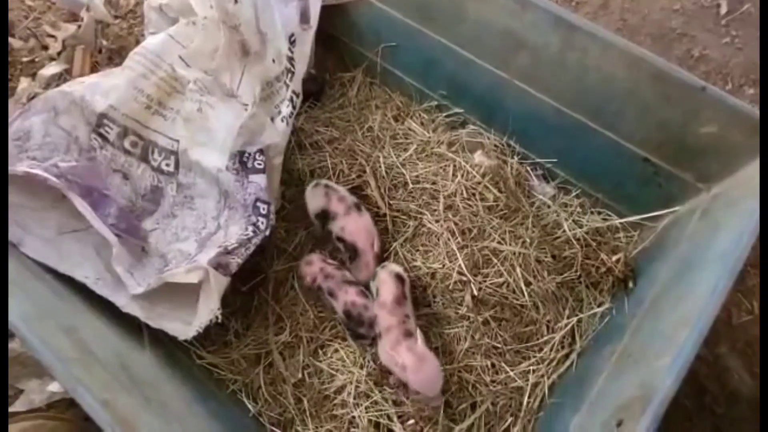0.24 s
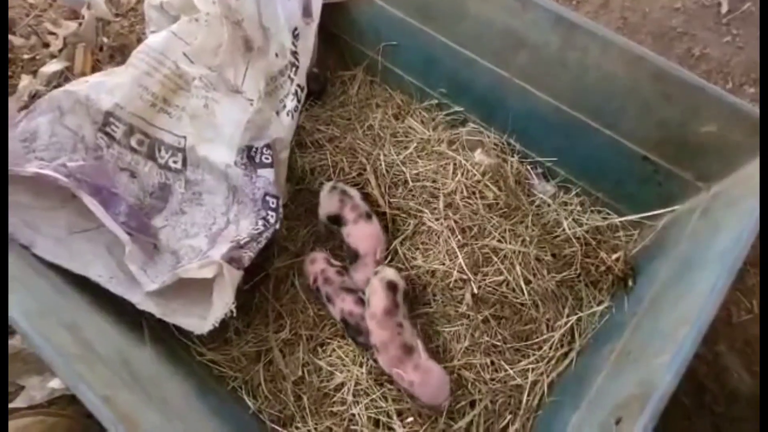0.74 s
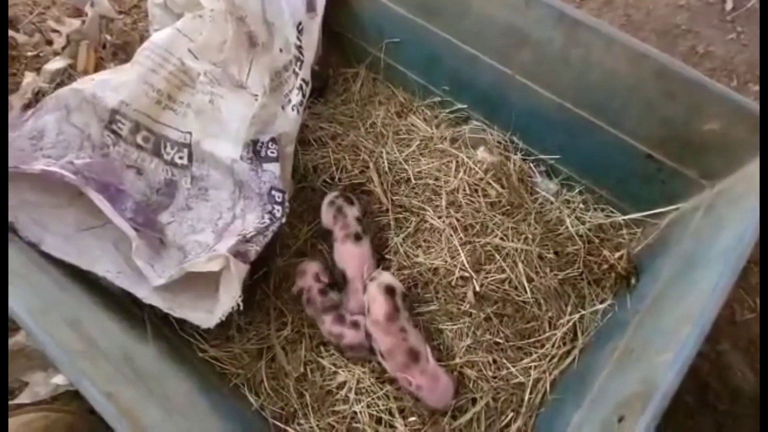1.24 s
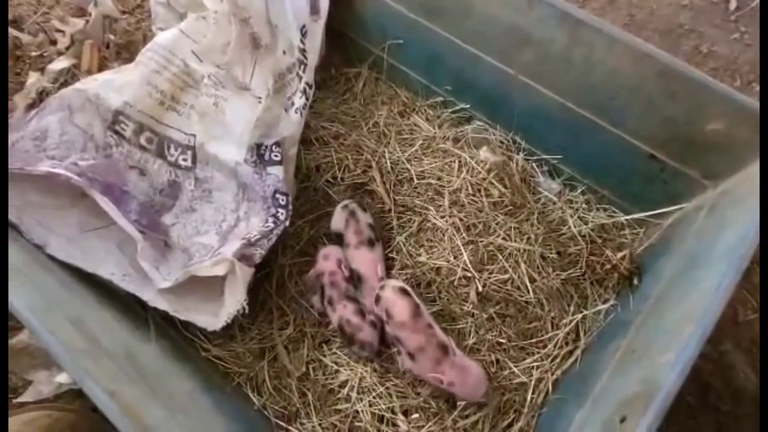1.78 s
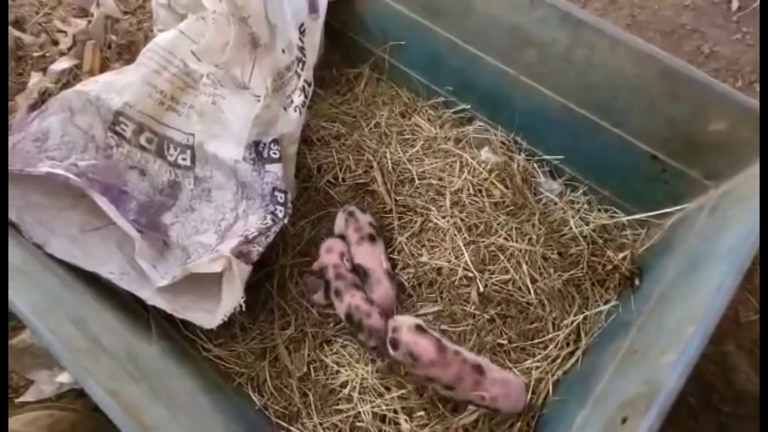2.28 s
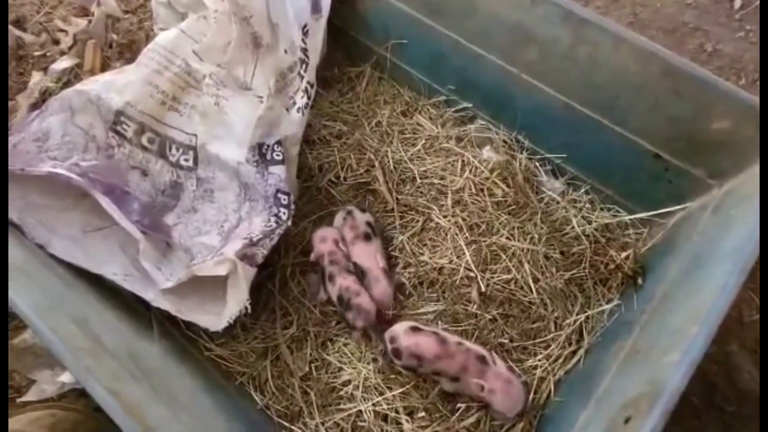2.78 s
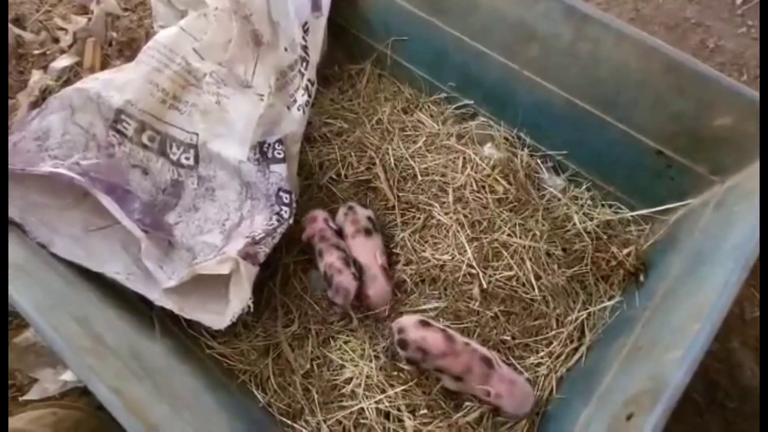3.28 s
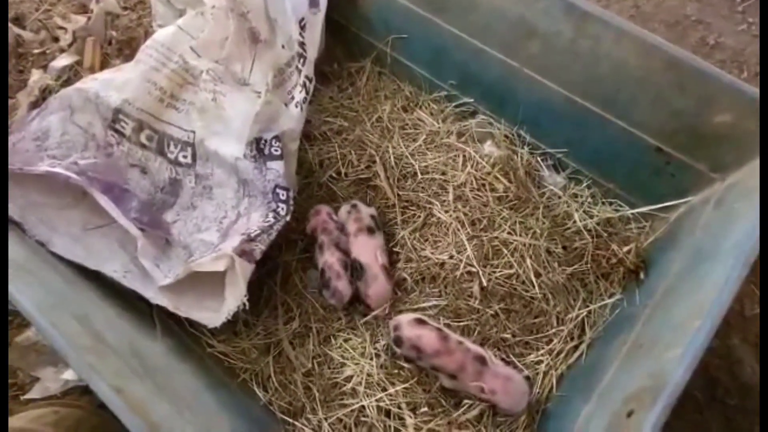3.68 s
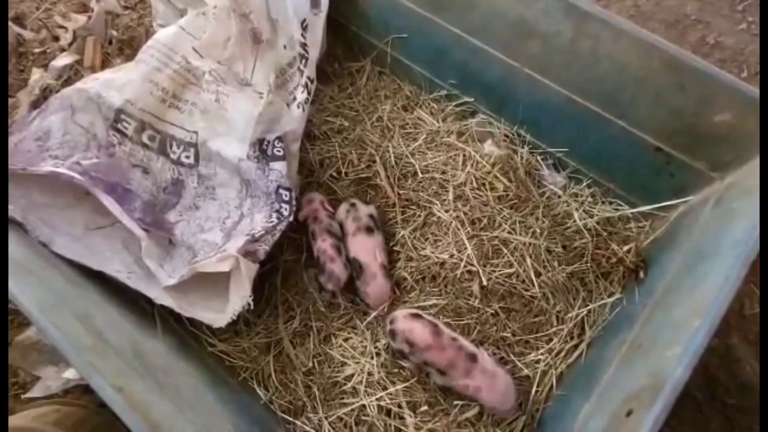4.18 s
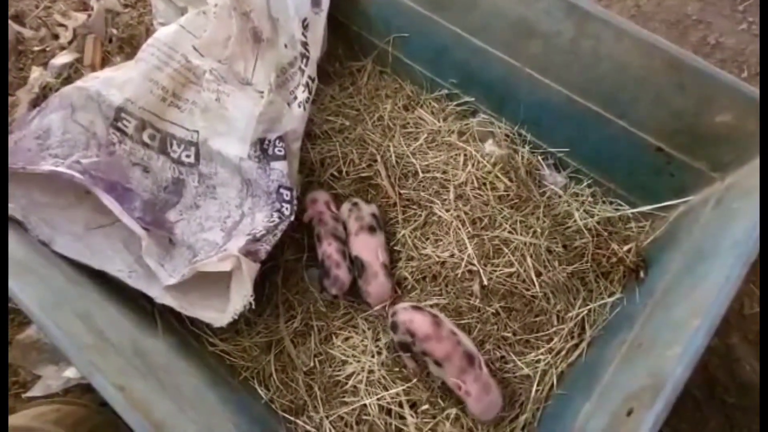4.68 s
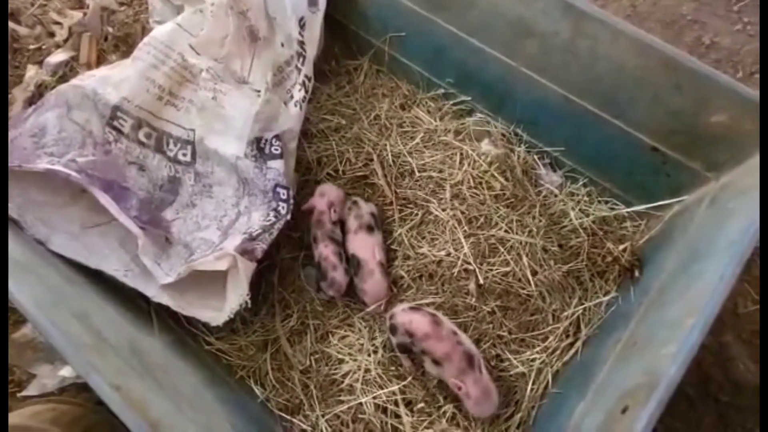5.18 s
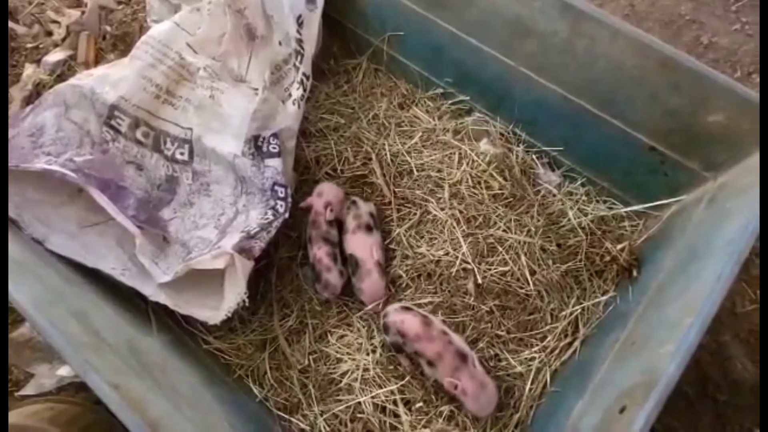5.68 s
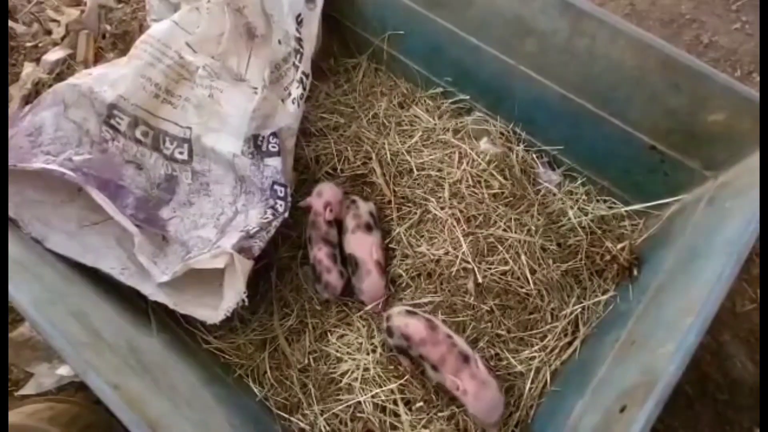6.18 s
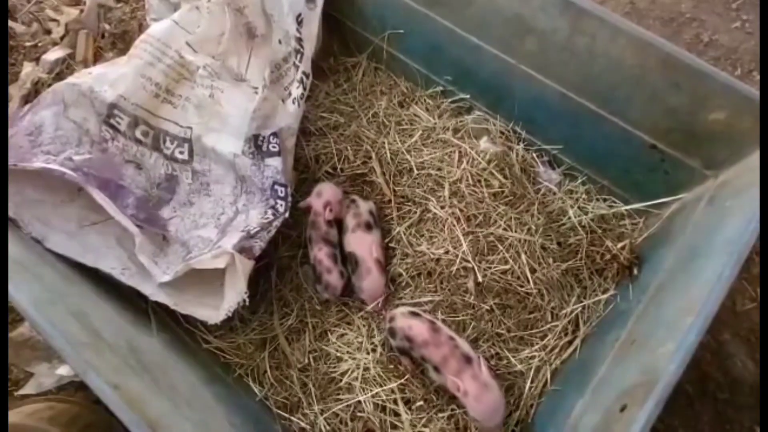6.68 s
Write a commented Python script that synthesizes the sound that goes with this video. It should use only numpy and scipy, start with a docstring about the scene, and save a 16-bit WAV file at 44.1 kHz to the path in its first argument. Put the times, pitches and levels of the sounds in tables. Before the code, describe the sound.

Hungry-sounding baby piglets cry in three quick bouts inside a straw-lined plastic tub, with soft crackling bedding and a deep background drone.

```python
"""In a farm shed, close over a plastic tub, in stereo: newborn piglets shuffle on straw.
A run of thin, hoarse squeals leads to one long, throbbing, rasping cry and a run of throatier ones.
Uneven pulses and puffs of noise, shaped by throat, mouth and tub, make the voices; clear notes are sines.
Shaped noise grains make the straw crackle, and decaying sines make two knocks on the tub floor.
The shed answers with a brief noise tail; low noise and a drone rumble on underneath."""
import sys
import numpy as np
from scipy import signal
from scipy.fft import rfft, irfft, next_fast_len
from scipy.io import wavfile
from scipy.ndimage import uniform_filter1d

SR = 44100
rng = np.random.default_rng(int(sys.argv[2]) if len(sys.argv) > 2 else 0)


def store_pcm(level_fs):
    """Save levels as 16-bit WAV."""
    pcm = np.round(np.clip(level_fs, -1, 1) * 32767).astype(np.int16)
    wavfile.write(sys.argv[1], SR, np.atleast_2d(pcm).T)


N = 305912
TIME = np.arange(N) / SR


def from_db(db):
    """Decibels to amplitude gain."""
    return 10 ** (np.asarray(db) / 20)


def rms_one(x):
    """Scale to unit power."""
    return x / np.sqrt(np.mean(x ** 2) + 1e-20)


def at_hz(points, hz):
    """Read a (frequency, value) table on a log-frequency axis."""
    points = np.array(points)
    return np.interp(np.log(np.maximum(hz, 1)), np.log(points[:, 0]), points[:, 1])


def along(rows, t):
    """Read each column of a curve at the times t."""
    s, *columns = np.transpose(rows)
    return [np.interp(t, s, column) for column in columns]


def coloured(x, spectrum):
    """Give a steady sound a spectrum that falls away steeply beyond its ends, at unit power."""
    size = next_fast_len(x.shape[-1])
    hz = np.arange(size // 2 + 1) * SR / size + 0.00088
    low_skirt = 1 / (1 + (.8 * spectrum[0][0] / hz) ** 8)
    high_skirt = 1 / (1 + (hz / spectrum[-1][0] / 1.2) ** 12)
    gain = from_db(at_hz(spectrum, hz)) * low_skirt * high_skirt
    return rms_one(irfft(rfft(x, size) * gain, size)[..., :x.shape[-1]])


def band(x, low_hz, high_hz, order=4):
    """Butterworth band-pass."""
    sos = signal.butter(order, [low_hz, min(high_hz, .45 * SR)], "band", fs=SR, output="sos")
    return signal.sosfilt(sos, x)


def resonance(x, hz, width_hz):
    """Two-pole resonance with gain 1 on top."""
    r = np.exp(-np.pi * width_hz / SR)
    zeros = np.array([1, 0, -1]) * (1 - r * r) / 2
    poles = [1, -2 * r * np.cos(2 * np.pi * hz / SR), r * r]
    return signal.lfilter(zeros, poles, x + 1e-18)


def drift(rate, size):
    """Smooth chance with spread of about 1, taking a new random value rate times a second."""
    knots = rng.standard_normal(8192)
    return 1.2 * np.interp(np.arange(size) * rate / SR % 8191, np.arange(8192), knots)


def levelled(x):
    """Even out slow swings of level in both channels together, keeping the grain."""
    power = uniform_filter1d(np.mean(x * x, axis=0), size=640)
    return x / np.sqrt(np.abs(power) + 1e-12)


def swell(t, centre, length):
    """A smooth rise and fall."""
    return np.cos(np.pi * np.clip((t - centre) / length, -.5, .5))


# how alike the two microphone sides are: (frequency [Hz], left-right correlation [-1 to 1])
SIDE_CORRELATION = [(60, 1), (125, 0.96), (250, 0.8), (500, 0.83), (1000, -0.2), (2000, -0.14),
                    (8000, -0.0094)]


def diffuse(size):
    """Stereo noise from all around: alike in the bass, nearly unrelated in the treble."""
    padded = next_fast_len(size)
    mid, side = rfft(rng.standard_normal((2, padded)))
    alike = np.clip(at_hz(SIDE_CORRELATION, np.arange(len(mid)) * SR / padded), -1, 1)
    both_sides = np.sqrt(1 + alike) * mid + np.sqrt(1 - alike) * side * [[1], [-1]]
    return rms_one(irfft(both_sides, padded)[:, :size])


# colour of the low rumble: (frequency [Hz], level [dB])
RUMBLE_COLOUR = [(13, -48), (22, -17), (31, -27), (43, 1), (59, 3), (81, -1.5), (114, 1.5), (151, -7.5),
                 (200, -21.5), (230, -15.5), (275, -24), (330, -22), (430, -42), (730, -120)]
# slow growth of the rumble, before its offset and waver: (time [s], level [dB])
RUMBLE_LEVEL = [(0, -53), (1.6, -52), (4.0, -50.5), (6.94, -49.5)]
# the upper edge of the rumble filling in: (time [s], level [dB])
RUMBLE_TOP_LEVEL = [(0, -95), (1.7, -60.5), (3.6, -64), (4.5, -57), (5.6, -58.5), (6.94, -52)]
# colour of the air of the yard: (frequency [Hz], level [dB])
AIR_COLOUR = [(130, -9), (220, -0.5), (349, -17.5), (375, -7.5), (439, -6), (490, -4.5), (1020, 2),
              (1650, -2), (2620, -16.5), (3030, -34.5), (4000, -37.5), (5200, -59), (8800, -120)]
# course of the air, before its offset: (time [s], level [dB])
AIR_LEVEL = [(0, -73), (.6, -67.5), (1.1, -65.5), (3.45, -62), (5.2, -63), (6.15, -63.5), (6.94, -66.5)]


def background(rumble_db=2.5, air_db=6.5, drone_hz=108, drone_db=-56, waver_db=2.5, waver_hz=12):
    """Low, uneven noise with a wavering drone (noise through a sharp resonance), and soft yard air."""
    rumble_level = along(RUMBLE_LEVEL, TIME)[0] + rumble_db + waver_db * drift(waver_hz, N)
    low = coloured(diffuse(N), RUMBLE_COLOUR) * from_db(rumble_level)
    hush = coloured(diffuse(N), AIR_COLOUR) * from_db(along(AIR_LEVEL, TIME)[0] + air_db)
    drone = resonance(rng.standard_normal(N), drone_hz, 4.7)
    drone = rms_one(resonance(drone, drone_hz, 4.7))
    top = rms_one(band(diffuse(N), 120, 158, order=5)) * from_db(along(RUMBLE_TOP_LEVEL, TIME)[0])
    return low + top + hush + from_db(drone_db) * drone


def shed(x, tail_db, t60=0.31):
    """The sound itself, then the diffuse tail of the shed, falling 60 dB in t60 seconds."""
    t = TIME[:SR * 3 // 4]
    tail = diffuse(len(t)) * from_db(-60 * t / t60) * np.clip(t / 0.016, 0, 1)
    tail = rms_one(tail) / np.sqrt(len(t))
    return x + from_db(tail_db) * signal.fftconvolve(np.atleast_2d(x), tail, axes=1)[:, :N]


# balance between the microphone sides: (frequency [Hz], left minus right [dB])
SIDE_BALANCE = [(400, -0.5), (1200, 0.8), (2200, -1), (3300, 2), (4300, 7), (7000, 5.5), (9000, 3),
                (13000, 0.5)]


def leaning(x):
    """Most of the treble reaches the left side more strongly than the right."""
    size = next_fast_len(N + 2048)
    lean_db = at_hz(SIDE_BALANCE, np.arange(size // 2 + 1) * SR / size)
    return irfft(rfft(x, size) * from_db(lean_db * [[.5], [-.5]]), size)[:, :N]


def crackle(per_s, spread_db):
    """Tiny stalk slips of uneven size, scattered at random on each side."""
    sizes = from_db(spread_db * np.minimum(rng.exponential(1, (2, N)), 4)) * rng.standard_normal((2, N))
    return rms_one(sizes * (rng.random((2, N)) < per_s / SR))


# the constant rustle, before its offset and restlessness: (time [s], level [dB])
STRAW_LEVEL = [(0, -76.5), (.6, -70), (1.3, -68), (2.4, -65.5), (3.0, -61), (3.4, -72), (4.05, -74.5),
               (4.6, -67.5), (5.2, -73), (5.7, -75.5), (6.3, -78.5), (6.94, -84)]
# colour of rustle, ticks and bursts: (frequency [Hz], level [dB])
STRAW_COLOUR = [(2500, -17.5), (4000, -9), (5500, 2), (8000, -2), (10000, 0.5), (13000, -7), (14000, -47)]
# bursts of brighter rustling, before their offset: (centre time [s], length [s], level [dB])
RUSTLES = [(1.202, .044, -46.5), (1.236, .03, -57), (1.341, .044, -59), (2.005, .07, -66),
           (2.456, .11, -56.5), (3.023, .092, -57), (3.489, .063, -64.5), (3.64, .071, -70),
           (3.908, .06, -69), (4.382, .09, -57.5), (4.52, .09, -64), (4.975, .04, -61), (5.03, .11, -65),
           (5.18, .04, -82), (6.075, .038, -65.5), (6.383, .062, -73.5)]
# bodies pushing through the bedding, before their offset: (centre time [s], length [s], level [dB])
SHUFFLES = [(0.537, 0.14, -56), (0.657, 0.34, -60.5), (0.836, 0.14, -51), (1.23, 0.067, -53),
            (3.525, 0.046, -55.5), (3.65, 0.08, -51.5)]
# colour of the pushes: (frequency [Hz], level [dB])
SHUFFLE_COLOUR = [(120, -72), (200, -2.5), (488, 1.5), (1020, -14), (1230, -6), (1800, -11.5), (2250, -9.5),
                  (3630, -20.5), (9000, -25.5), (11700, -93), (19800, -120)]


def straw(rustle_db=0, burst_db=1, shuffle_db=2, restless_db=1.2, restless_hz=24, ticks_per_s=14, ticks_db=-7):
    """A restless rustle of dense grains, sparse ticks, bursts, and duller pushes as a piglet shifts."""
    bursts = sum(from_db(db + burst_db) * swell(TIME, s, length) ** 2 for s, length, db in RUSTLES)
    stir = from_db(along(STRAW_LEVEL, TIME)[0] + rustle_db + restless_db * drift(restless_hz, N))
    rustle = coloured(crackle(2500, 1.6), STRAW_COLOUR) * (stir + bursts)
    ticks = coloured(crackle(ticks_per_s, 1.5), STRAW_COLOUR) * stir * from_db(ticks_db)
    push = sum(from_db(db + shuffle_db) * swell(TIME, s, length) ** 2 for s, length, db in SHUFFLES)
    return rustle + ticks + push * coloured(crackle(2500, 2.5), SHUFFLE_COLOUR)


# snapping stalks, before their offset: (time [s], crack level [dB], body relative to crack [dB])
SNAPS = [(1.2, -40, -28), (1.4182, -49.5, -10), (2.5457, -44.5, 7), (2.7172, -43, -8.5),
         (3.634, -44.5, -23), (3.6566, -66, -9), (3.9697, -53, 4), (4.191, -55, -19), (4.202, -50.5, -14),
         (5.427, -61.5, -20)]
# colour of a cracking stalk: (frequency [Hz], level [dB])
STALK_COLOUR = [(1180, -50.5), (2000, -39), (2460, -33.5), (2710, -45.5), (3390, -32.5), (5390, 3),
                (7900, -7), (11500, -6.5), (13500, -22)]


def snaps(decay_s=0.0017, snap_db=4):
    """A dry stalk cracks brightly and knocks the bedding under it: a fast-decaying burst of noise."""
    out, t = np.zeros((2, N)), TIME[:2048]
    for s, crack_db, body_db in SNAPS:
        # partly alike on both sides
        noise = rng.standard_normal((2, len(t))) + rng.standard_normal(len(t))
        body = rms_one(band(noise, 1500, 2700, order=2))
        crack = coloured(noise, STALK_COLOUR) + from_db(body_db) * body
        start = int(s * SR)
        out[:, start:start + len(t)] += from_db(crack_db + snap_db) * crack * np.exp(-t / decay_s)
    return out


# a trotter knocking twice on the tub floor through the straw: (time [s], level [dB])
KNOCKS = [(3.6331, -42), (3.656, -42.5)]
# modes of the tub floor: (frequency [Hz], level relative to the knock [dB], time to fall 60 dB [s])
TUB_FLOOR_MODES = [(380, -11, .05), (513, 2, 0.058), (700, -3.5, 0.037), (1070, -11, 0.033)]


def knocks():
    """Each knock sets the modes of the tub floor ringing briefly, with strengths of its own."""
    out, t = np.zeros((2, N)), TIME[:4096]
    for s, knock_db in KNOCKS:
        start = int(s * SR)
        for hz, db, t60 in TUB_FLOOR_MODES:
            strength = from_db(knock_db + db + rng.normal(0, 2, (2, 1)) - 60 * t / t60)
            out[:, start:start + len(t)] += strength * np.sin(2 * np.pi * hz * t)
    return out


# moments of clearer voice, within the cries and between them, before offset, quaver and flutter:
# (centre time [s], length [s], start pitch [Hz], end pitch [Hz], level [dB], second harmonic over first [dB])
CLEAR_NOTES = [(1.102, .044, 311, 412, -45.5, -38), (1.229, .045, 608, 520, -44, -16),
               (1.363, 0.029, 625, 542, -38, -34), (1.56, 0.037, 586, 662, -38, -29),
               (1.676, 0.056, 572, 664, -42, -19), (1.779, 0.04, 926, 870, -40.5, -28),
               (1.819, 0.091, 563, 524, -45, 4), (1.91, 0.056, 500, 547, -41.5, 3),
               (1.989, 0.048, 835, 868, -32, -13), (2.203, .049, 793, 754, -36.5, -13),
               (2.425, 0.079, 407, 462, -36, -15), (2.583, .07, 612.4, 456, -30, -15),
               (2.653, 0.02, 740, 740, -29, -22), (2.696, .04, 676, 635, -24, -28),
               (2.746, 0.025, 708, 773, -22, -23), (2.838, 0.041, 874, 843, -22.5, -29),
               (2.958, 0.03, 654, 647, -25.5, -24), (3.011, 0.021, 750, 750, -26.5, -22),
               (3.138, 0.03, 434, 449, -33.5, 7), (3.211, 0.042, 625.8, 591, -30, -23),
               (3.293, .09, 354, 300.8, -43, -1), (3.337, .026, 673, 633, -29.5, -28),
               (4.152, 0.07, 408, 470, -34.5, -18), (4.339, 0.038, 548, 481, -32, -6),
               (4.381, 0.055, 437, 410, -45, 10), (4.478, 0.032, 484, 474, -31, -1),
               (4.507, .046, 431, 420, -51.5, 17), (4.623, 0.077, 425, 406.7, -37, 7),
               (4.733, 0.065, 463.3, 415, -34, 0.5), (4.868, .047, 366.8, 374, -31.5, 6.5),
               (4.918, .06, 369.3, 355, -47, 11), (4.986, .05, 342, 328, -54.5, 13.5),
               (5.031, .03, 354, 352, -53.5, 10)]


def clear_notes(notes_db=-1, upper_db=-14, ear_phase=0.61):
    """The folds lock into a short, quavering tone; the tub's walls shift its phase between the sides."""
    out = np.zeros((2, N))
    for centre, length, start_hz, end_hz, level_db, second_db in CLEAR_NOTES:
        at = np.flatnonzero(np.abs(TIME - centre) < length / 2)
        quaver = 1 + .028 * drift(260, len(at))
        flutter = from_db(2.5 * drift(170, len(at)))
        phase = 2 * np.pi * np.cumsum(np.linspace(start_hz, end_hz, len(at)) * quaver) / SR
        shift = ear_phase * rng.choice([-1, 1]) * np.array([[1], [-1]])  # radians
        upper = sum(np.sin(k * phase + shift) for k in range(3, 5))
        overtones = np.sin(2 * phase - shift) + from_db(upper_db) * upper
        tone = np.sin(phase + shift) + from_db(second_db) * overtones
        out[:, at] += from_db(level_db + notes_db) * swell(TIME[at], centre, length) * flutter * tone
    return out


def larynx(pitch_hz, rough, flap_hz, jitter=.085, shimmer_db=5, flap_share=0.95, air_share=0.55):
    """The folds pulse at the pitch; strain breaks them into slow uneven slaps and puffs of turbulent air."""
    rough, size = np.clip(rough, 0, 1), len(pitch_hz)
    turns = np.cumsum(pitch_hz * np.exp(jitter * rough * drift(220, size))) / SR
    flaps = np.cumsum(flap_hz * np.exp(.3 * drift(150, size))) / SR
    # one click for each completed cycle
    pulses, slaps = (rms_one(np.diff(np.floor(cycles), prepend=0)) for cycles in (turns, flaps))
    puffs = rms_one(np.exp(-4 * (flaps % 1)) * rng.standard_normal(size))
    strength = from_db(shimmer_db * rough * drift(252, size))
    return strength * ((1 - rough) * pulses + rough * (flap_share * slaps + air_share * puffs))


def mouth(source, throat, mouth_hz, sweep_db, shut_db=10, wander_db=2):
    """Throat colour, rippling with the tongue, and a sliding peak or dip above which the sound is duller."""
    t = TIME[:len(source)]
    hz, s, frames = signal.stft(source, SR, nperseg=1024, noverlap=896)
    octaves = np.log2((hz[:, None] + 1) / np.interp(s, t, mouth_hz))
    slide = sweep_db * np.exp(-(octaves / 0.3) ** 2) - shut_db * np.clip(octaves / .5, 0, 1)
    tongue = np.interp(s, t, drift(35.37, len(source)))
    ripple = np.cos(2 * np.pi * hz[:, None] / 900 + 2 * tongue)
    gain = from_db(at_hz(throat, hz)[:, None] + slide + wander_db * ripple)
    return signal.istft(frames * gain, SR, nperseg=1024, noverlap=896)[1][:len(source)]


# narrow resonances of the tub and shed, before their offset: (frequency [Hz], width [Hz], level [dB])
TUB_RESONANCES = [(618, 9, -9.5), (800, 32, -5)]


def tub(x, ring_db=-2):
    """The hollow tub favours a few narrow bands."""
    return x + sum(from_db(db + ring_db) * resonance(x, hz, width) for hz, width, db in TUB_RESONANCES)


def walls(x, early_s=0.0089, direct_db=-7):
    """Dense first reflections off the tub, different for every turn of the head."""
    t = TIME[:2048]
    echoes = rms_one(diffuse(len(t)) * np.exp(-t / early_s)) / np.sqrt(len(t))
    echoes[:, 0] += from_db(direct_db)
    return signal.fftconvolve(x[None], echoes, axes=1)


# depth and rate of the flaring upper partials in each kind of cry
THIN_TEAR_DB, LONG_TEAR_DB, THROATY_TEAR_DB, TEAR_HZ = 2.0, 2.0, 1.6, 55


def torn(voice, depth_db, flicker_hz, width_hz=450):
    """Under strain the upper partials flare and drop out, each stretch of the spectrum on its own."""
    size = voice.shape[1]
    hz, s, frames = signal.stft(voice, SR, nperseg=512, noverlap=384)
    flares = 0
    for centre in np.arange(1000, 8000, width_hz):
        flicker = np.interp(s, TIME[:size], drift(flicker_hz, size))
        flares = flares + np.outer(swell(hz, centre, 2 * width_hz) ** 2, flicker)
    return signal.istft(frames * from_db(depth_db * flares), SR, nperseg=512, noverlap=384)[1][:, :size]


def registers(voice, throat_db, rasp_db, edge_db, hiss_db,
              grain_db=0.42, grain_hz=150, spit_db=1.5, spit_hz=260):
    """Effort sets the low throat band, the rasp, the shrill edge and the hiss that rides on the pulses."""
    size = voice.shape[1]
    beat = levelled(np.abs(band(voice, 1500, 8000, order=2)))
    hiss = levelled(band(beat * rng.standard_normal((2, size)), 7600, 13000, order=8))
    grain = grain_db * drift(grain_hz, size)
    parts = [(190, 1500, throat_db), (1500, 3800, rasp_db + grain), (3800, 8000, edge_db + grain)]
    voiced = sum(from_db(db) * levelled(band(voice, low, high, order=8)) for low, high, db in parts)
    hiss_gain = from_db(hiss_db + grain + spit_db * drift(spit_hz, size))
    ending = np.minimum(TIME[:size][::-1] / .07, 1)
    return ending * (voiced + hiss_gain * hiss)


def effort(t, attack_s, hold_s, fade_s):
    """In dB: a swell from near silence, a hold around t = 0, and a fade of 20 dB per fade_s."""
    swelling = np.clip(1 + (t + hold_s / 2) / attack_s, 1e-3, 1)
    return 20 * (np.log10(swelling ** 2) - np.maximum(t - hold_s / 2, 0) / fade_s)


def around(peak_s):
    """The samples of one short squeal and their times from its peak."""
    at = int(peak_s * SR) + np.arange(int(-.1 * SR), int(.17 * SR))
    return at, TIME[at] - peak_s


# what the throat passes of the clear harmonics: (frequency [Hz], level [dB])
CLEAR_THROAT = [(300, -35), (360, -16.5), (440, -2.5), (540, -2), (630, -2), (760, 4), (880, -4),
                (1000, -17), (1200, -11.5), (1430, -13.5), (1800, -31)]


def harmonics(pitch_hz, quaver=.03, quaver_hz=140, count=5):
    """Clear voice: each harmonic swells as the pitch carries it through a resonance of the throat."""
    pitch_hz = pitch_hz * np.exp(quaver * drift(quaver_hz, len(pitch_hz)))
    phase = 2 * np.pi * np.cumsum(pitch_hz) / SR
    tone = sum(from_db(at_hz(CLEAR_THROAT, k * pitch_hz)) * np.sin(k * phase) for k in range(1, count + 1))
    return levelled(walls(tone, early_s=0.0016, direct_db=-2)[:, :len(tone)])


# the last squeal sinking away, before offset, quaver and flutter: (time [s], pitch [Hz], level [dB])
WHINE = [(4.88, 380.6, -50), (4.905, 368.4, -44), (4.948, 359.2, -48), (4.978, 348.4, -50),
         (5.008, 326, -54), (5.034, 352, -51), (5.08, 309.4, -54.5), (5.14, 290, -62)]


def whine(whine_db=0.5, flutter_db=2):
    """A thin tone of two harmonics that wavers, falls and dies away."""
    at = np.flatnonzero((TIME > WHINE[0][0]) & (TIME < WHINE[-1][0]))
    pitch_hz, level = along(WHINE, TIME[at])
    tone = harmonics(pitch_hz, quaver=0.016, count=2)
    gain = from_db(level + whine_db + flutter_db * drift(95, len(at)))
    out = np.zeros((2, N))
    out[:, at] = tone * gain * signal.windows.tukey(len(at), .1)
    return out


# thin squeals, before offsets and pitch sag: (peak time [s], attack [s], fade [s], throat level [dB],
# rasp over throat [dB], shrill edge over throat [dB], pitch [Hz], roughness [0-1], throat resonance [Hz],
# snout resonance [Hz], snout width [Hz], mouth resonance [Hz])
THIN_CRIES = [(1.232, 0.03, 0.068, -54.5, -5.5, -1.5, 580, 0.34, 1080, 3540, 261, 4650),
              (1.37, 0.018, 0.084, -50.5, -1, -2.5, 570, 0.55, 573, 2160, 260, 4330),
              (1.466, 0.04, 0.068, -40, 0, -2, 591, 0.54, 906, 3170, 400, 4430),
              (1.572, 0.028, 0.095, -39.5, -0.5, -0.5, 610, 0.53, 920, 3170, 303, 4300),
              (1.682, 0.042, 0.094, -39, 0, 1.5, 593.6, 0.46, 1120, 2460, 260, 4180),
              (1.786, .019, 0.083, -40.5, -3.5, 2.5, 550, 0.47, 880, 2280, 260, 4700),
              (1.882, 0.03, 0.12, -39.5, -0.5, 2.5, 535, 0.56, 930, 3300, 300, 5350),
              (1.987, 0.048, 0.056, -37, -1.5, -1, 481.2, 0.61, 845, 3050, 400, 5540),
              (2.094, 0.1, .06, -39.5, -2.5, -8, 515, 0.77, 1050, 3300, 400, 4270),
              (2.19, 0.039, 0.083, -40.5, -1.5, 5.5, 486.4, 0.66, 1020, 4600, 787, 4440),
              (2.33, .045, 0.078, -45, -8, 0.5, 431.6, 0.57, 990, 3080, 398, 6060)]
# throat colour of the thin squeals: (frequency [Hz], level [dB])
THIN_THROAT = [(190, -25), (330, -12.5), (473, -12), (533, -7.5), (678, -10.5), (862, -3), (1340, -14),
               (1680, -7), (1920, -10.5), (2220, -1.5), (2720, -8.5), (3270, -6), (4330, -5), (6460, -3.5),
               (8000, -11), (10400, -72.5), (17600, -120)]


def thin_squeals(hold_s=0.027, opening_s=0.05, slide_octaves=0.084, sag_octaves=.07, focus_db=4.5, bite_db=0,
                 throat_db=0.0, rasp_db=0.5, edge_db=-3.5, hiss_db=-22, edge_lag_s=0.0029):
    """Quick, hoarse cries, each with its own throat and snout; the pitch sags while the mouth opens."""
    out = np.zeros((2, N))
    for (peak_s, attack_s, fade_s, level, rasp, edge, pitch_hz, rough,
         throat_hz, snout_hz, snout_width_hz, mouth_hz) in THIN_CRIES:
        at, t = around(peak_s)
        opening = np.tanh(t / opening_s)
        sagging_hz = pitch_hz * 2 ** (-sag_octaves * opening)
        source = larynx(sagging_hz, rough, flap_hz=198.7, jitter=.06, air_share=0.18)
        opening_hz = mouth_hz * 2 ** (slide_octaves * opening)
        voice = mouth(source, THIN_THROAT, opening_hz, sweep_db=2.5, wander_db=1.5)
        focus = from_db(focus_db) * resonance(voice, throat_hz, 83)
        bite = from_db(bite_db) * resonance(voice, snout_hz, snout_width_hz)
        in_tub = walls(tub(voice + focus + bite), direct_db=-8.5)[:, :len(t)]
        strained = torn(in_tub, THIN_TEAR_DB, TEAR_HZ)
        db = level + effort(t, attack_s, hold_s, fade_s)
        late_db = level + edge + effort(t - edge_lag_s, attack_s, hold_s, fade_s)
        out[:, at] += registers(strained, db + throat_db, db + rasp + rasp_db, late_db + edge_db, db + hiss_db)
    return out


# resonances of the wide-open snout in the throaty squeals: (frequency [Hz], width [Hz], level [dB])
SNOUT_RESONANCES = [(2100, 260, -0.5), (3180, 830, 2.5), (4960, 700, 11)]


def snout(x):
    """The open snout adds bite in a few bands."""
    return x + sum(from_db(db) * resonance(x, hz, width) for hz, width, db in SNOUT_RESONANCES)


# throaty squeals, before offsets, glide and clearing: (peak time [s], attack [s], hold [s], fade [s],
# throat level [dB], rasp over throat [dB], shrill edge over throat [dB], lag of the edge [s], pitch [Hz],
# roughness [0-1])
THROATY_CRIES = [(4.149, .022, 0.022, .05, -53, 7.5, -4.5, 0.011, 424, 0.7),
                 (4.262, 0.051, 0.0091, 0.054, -32, 2, -15.5, .046, 451, .85),
                 (4.363, .065, 0.017, 0.064, -32, 6, -11.5, 0.046, 446.7, 0.71),
                 (4.482, 0.085, 0.011, 0.087, -32.5, 7, -8, 0.045, 439, 0.7),
                 (4.602, 0.079, 0.01, 0.068, -31, 8.5, -9, 0.023, 420.9, 0.37),
                 (4.717, .01, 0.046, 0.05, -33.5, 8, -7, 0.025, 432, 0.58),
                 (4.87, 0.069, 0.013, 0.059, -34.5, 6, -6.5, .0098, 364.6, .6),
                 (4.967, .05, 0.025, 0.3, -44.5, -3, -3.5, 0.0037, 337.7, 0.94)]
# throat colour of the throaty squeals: (frequency [Hz], level [dB])
THROATY_THROAT = [(160, -53.5), (280, -14.5), (322, -39), (353, -11.5), (456, -9), (620, -9), (723, -10),
                  (844, -7.5), (935, -12), (1620, -21.5), (2150, 5), (2350, -1.5), (3370, -5), (4350, -9),
                  (6000, -22.5), (7800, -24), (13200, -120)]


def throaty_squeals(settle_s=.022, start_sharp=.25, sag_octaves_per_s=.9, clearing=.2, opening_s=0.049,
                    edge_attack_s=0.054, edge_hold_s=0.044, edge_fade_s=0.1,
                    throat_db=-0.5, rasp_db=-4.0, edge_db=-2.5, hiss_db=-22):
    """Each starts high and rough, then sinks and clears; the shrill edge lags as the mouth opens."""
    out = np.zeros((2, N))
    for peak_s, attack_s, hold_s, fade_s, level, rasp, edge, lag_s, pitch_hz, rough in THROATY_CRIES:
        at, t = around(peak_s)
        strain = .5 - .5 * np.tanh(t / settle_s + 1)
        glide = (1 + start_sharp * rough * strain) * 2 ** (-sag_octaves_per_s * t)
        roughness = rough - clearing * np.tanh(t / settle_s)
        source = larynx(pitch_hz * glide, roughness, flap_hz=169.8, jitter=.06, air_share=0.5)
        opening_hz = np.interp(t - lag_s, [-opening_s, opening_s], [2700, 5400])
        voice = snout(mouth(source, THROATY_THROAT, opening_hz, sweep_db=3))
        in_tub = walls(tub(voice), direct_db=-5.5)[:, :len(t)]
        strained = torn(in_tub, THROATY_TEAR_DB, TEAR_HZ)
        db = level + effort(t, attack_s, hold_s, fade_s)
        late_db = level + edge + effort(t - lag_s, edge_attack_s, edge_hold_s, edge_fade_s)
        out[:, at] += registers(strained, db + throat_db, db + rasp + rasp_db,
                                late_db + edge_db, late_db + hiss_db)
    return out


# the long cry, as onset, body and ending, before heaves, flutter and offsets:
# (time [s], throat level [dB], rasp over throat [dB], shrill edge over throat [dB])
LONG_CRY = [
    [(2.39, -52.5, -3, -32), (2.455, -41.5, -12, -25), (2.495, -31.5, -3.5, -33), (2.53, -38.5, -4, -14),
     (2.575, -30, -2, -29), (2.605, -34, 3.5, -20.5)],
    [(2.64, -32, -4.5, -20), (2.69, -28.5, 0, -26.5), (2.745, -31, -0.5, -14.5),
     (2.785, -30.5, -4.5, -23.5), (2.87, -32, 1.5, -18), (2.945, -30.5, -2.5, -20),
     (3.02, -30, -0.5, -14.5), (3.1, -32, -2, -20), (3.236, -31, -4, -19), (3.28, -36, -0.5, -13)],
    [(3.305, -32.5, -14.5, -15), (3.33, -39, -5.5, -34), (3.352, -42, -12, -25), (3.39, -50, -10, -30),
     (3.42, -69, -7, -19)],
]
# the folds between heaves, before the warble: (time [s], pitch [Hz], roughness [0-1])
LONG_FOLDS = [(2.42, 378.9, 0.65), (2.56, 330.8, 0.5), (2.69, 314.8, 0.69), (2.93, 305.5, 0.51),
              (3.1, 319.2, 0.64), (3.25, 301.9, 0.63), (3.34, 323, 0.37)]
# heaves, before the warble: (centre time [s], length [s], rise of pitch [Hz], extra level [dB])
HEAVES = [(2.497, .05, 39.78, 2), (2.597, 0.04, 60.4, 2.5), (2.719, 0.053, 130.7, 1),
          (2.834, 0.081, 124.6, 6), (2.899, 0.038, 110.1, 0.5), (2.979, 0.047, 150.2, 2.5),
          (3.051, .04, 105.5, 1), (3.141, 0.074, 100.7, 0.5), (3.212, 0.042, 126, 1.5)]
# throat colour of the long cry: (frequency [Hz], level [dB])
LONG_THROAT = [(160, -21), (280, -10), (330, -37.5), (444, 2.5), (532, 5), (733, 0), (877, 0), (1050, -7.5),
               (1450, -16.5), (1540, -24), (2070, -10.5), (2540, -15), (2740, -11), (3500, -20),
               (4200, -23.5), (5200, -27.5), (6000, -41), (7800, -44), (13200, -120)]


def long_cry(flutter_db=3, flutter_hz=31, rasp_flutter_db=2, head_turns_per_s=1.34, throat_share=0.66,
             throat_db=1, rasp_db=-0.5, edge_db=4.0, hiss_db=-18):
    """A sustained, fluttering scream; heaves throw the pitch up, and the head swings between the tub walls."""
    clear_db, hoarse_db, warble_octaves, warble_hz = -5.5, -5, .08, 80
    curve = np.vstack(LONG_CRY)
    start_s, end_s = curve[0, 0], curve[-1, 0]
    at = np.arange(int((start_s - .04) * SR), int((end_s + .04) * SR))
    t = TIME[at]
    level, rasp, edge = along(curve, t)
    pitch_hz, rough = along(LONG_FOLDS, t)
    pitch_hz = pitch_hz + sum(rise_hz * swell(t, centre, length) for centre, length, rise_hz, db in HEAVES)
    pitch_hz = pitch_hz * 2 ** (warble_octaves * drift(warble_hz, len(t)))
    heave = sum(db * swell(t, centre, length) for centre, length, rise_hz, db in HEAVES)

    source = larynx(pitch_hz, rough, flap_hz=126.2, flap_share=0.59, air_share=0.352)
    opening_hz = np.interp(t, [start_s, end_s], [2700, 5200])
    voice = tub(mouth(source, LONG_THROAT, opening_hz, sweep_db=-3.0, wander_db=2.0))
    turn = 2 * np.pi * head_turns_per_s * (t - start_s)
    voice = np.cos(turn) * walls(voice)[:, :len(t)] + np.sin(turn) * walls(voice)[:, :len(t)]

    flutter = np.sin(2 * np.pi * np.cumsum(flutter_hz * np.exp(0.33 * drift(40.15, len(t)))) / SR)
    low_db = level + throat_share * heave + flutter_db * flutter + throat_db
    high_db = level + heave + rasp_flutter_db * flutter
    hoarse = registers(torn(voice, LONG_TEAR_DB, TEAR_HZ), low_db + hoarse_db, high_db + rasp + rasp_db,
                       high_db + edge + edge_db, level + edge + hiss_db)
    clear = from_db(low_db + clear_db) * harmonics(pitch_hz)
    out = np.zeros((2, N))
    out[:, at] = signal.windows.tukey(len(t), .08) * (hoarse + clear)
    return out


def scene():
    """Three bouts of crying over the straw, in the shed."""
    rumble = background()
    bedding = shed(straw(), tail_db=-4) + shed(snaps() + knocks(), tail_db=-6.0)
    notes = shed(clear_notes(), tail_db=-3.0)
    thin = shed(thin_squeals(), tail_db=-9.0)
    throaty = shed(throaty_squeals() + whine(), tail_db=-6.5)
    long = shed(long_cry(), tail_db=-6)
    return leaning(thin + throaty + long + notes + bedding) + rumble


CUTOFF_HZ = 13400


def record(dry):
    """The top is cut steeply by an elliptic low-pass."""
    return signal.sosfilt(signal.ellip(10, .2, 70, CUTOFF_HZ, fs=SR, output="sos"), dry)


dry = scene()
out = record(dry)
store_pcm(out)
```